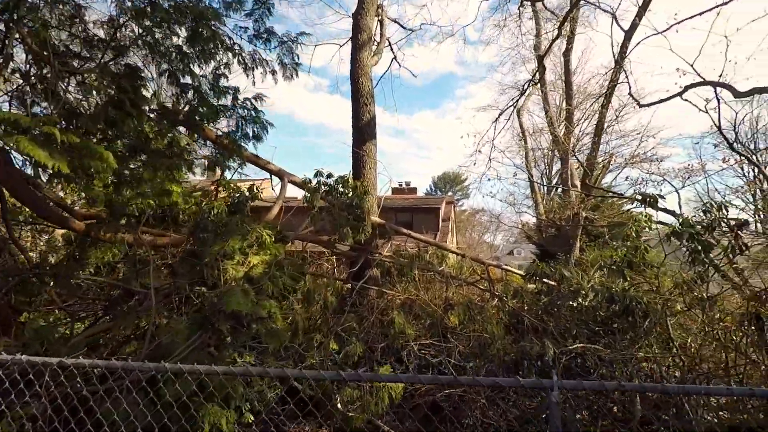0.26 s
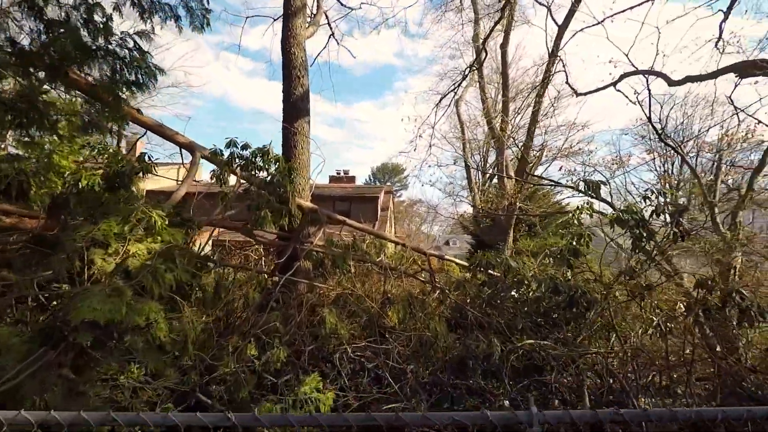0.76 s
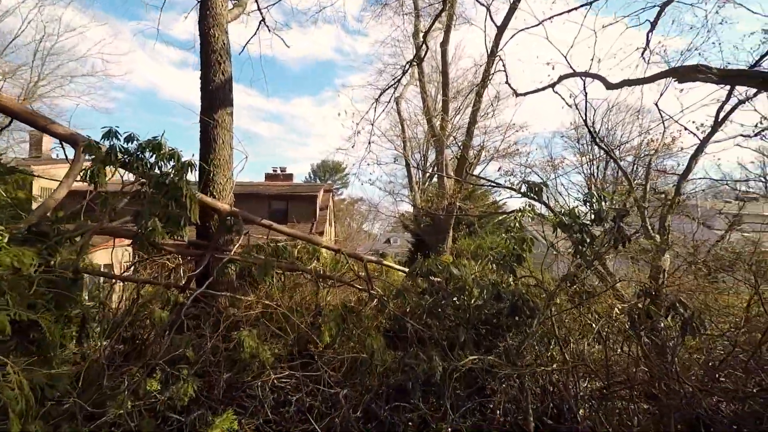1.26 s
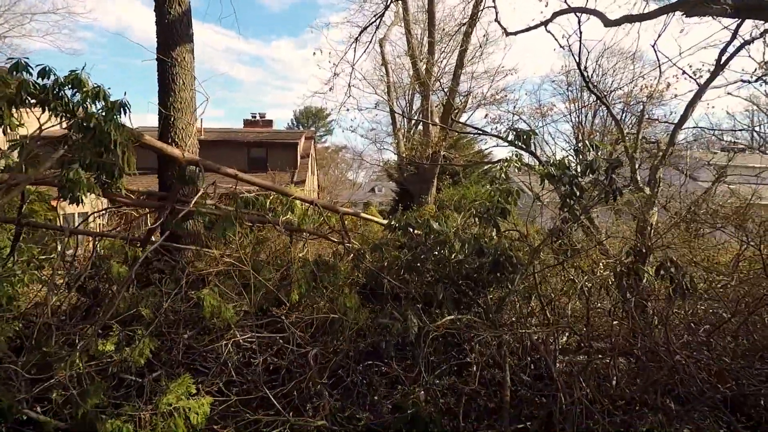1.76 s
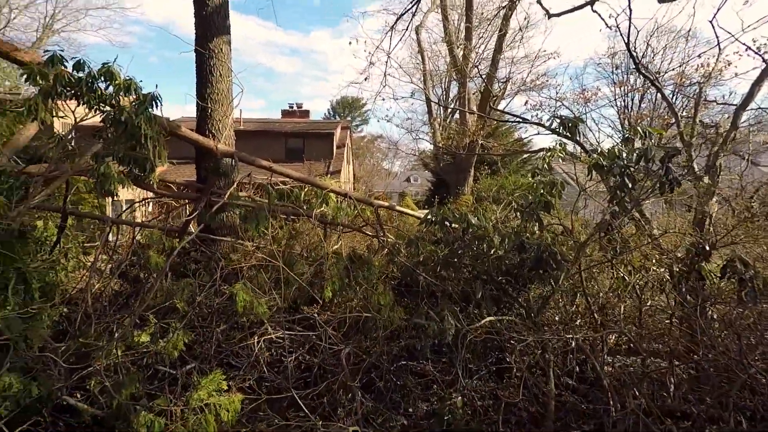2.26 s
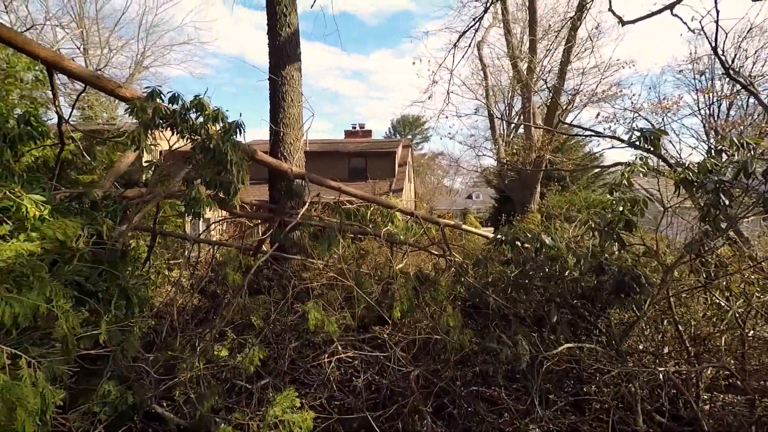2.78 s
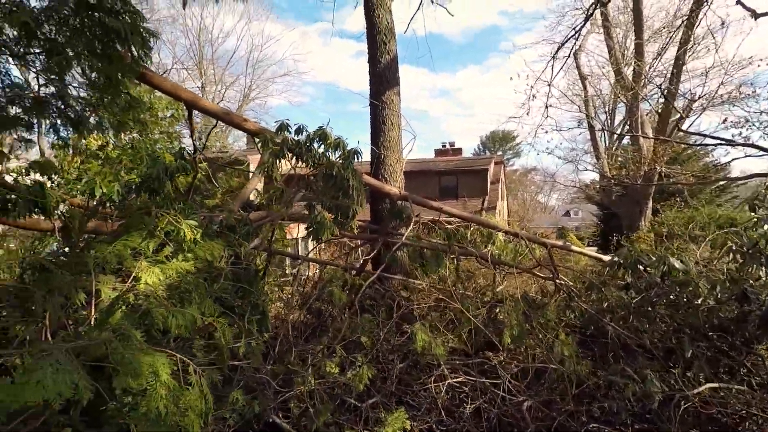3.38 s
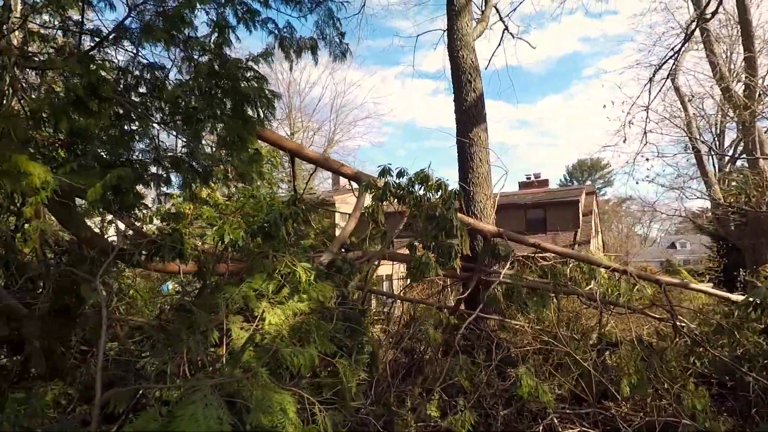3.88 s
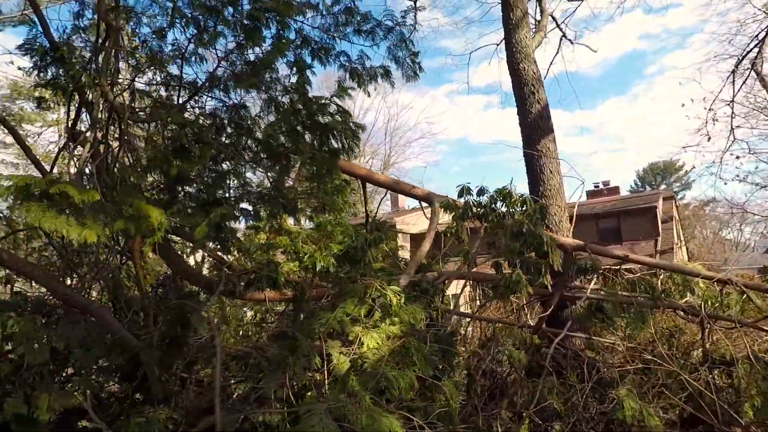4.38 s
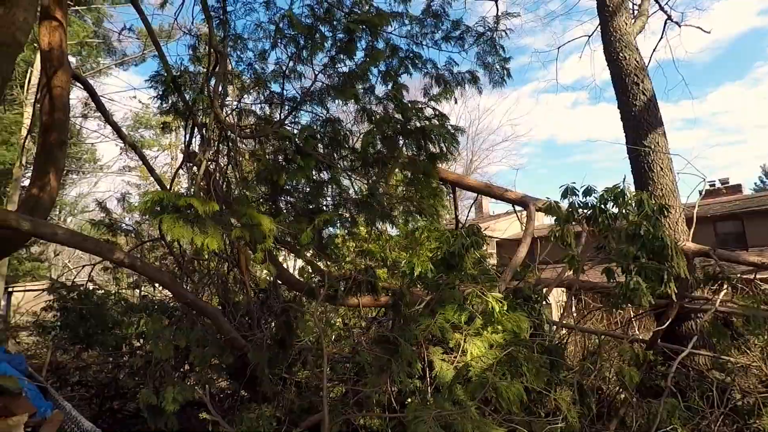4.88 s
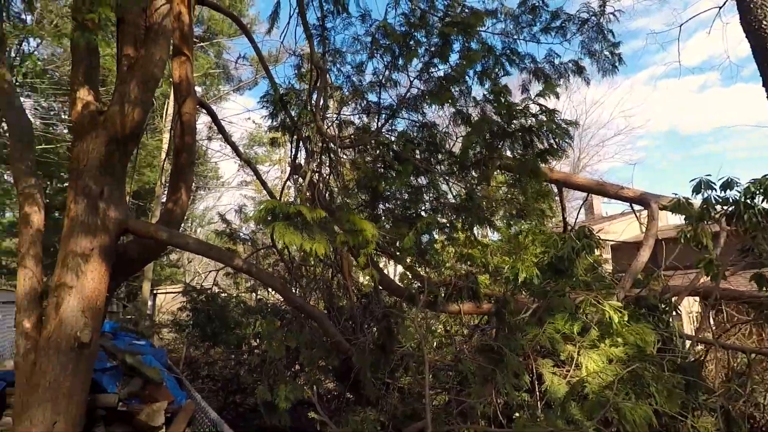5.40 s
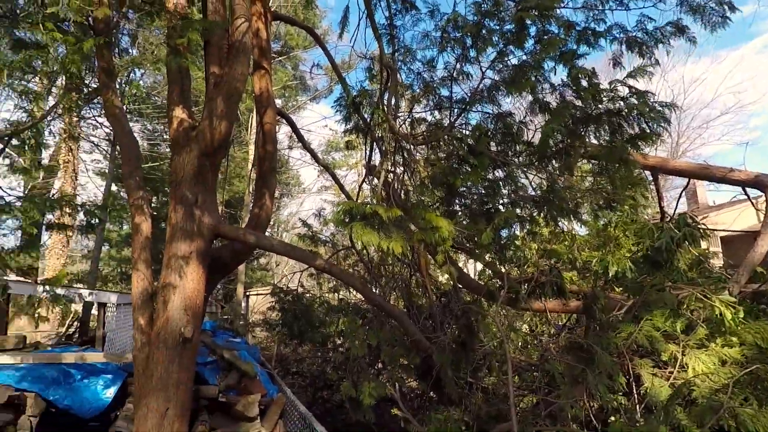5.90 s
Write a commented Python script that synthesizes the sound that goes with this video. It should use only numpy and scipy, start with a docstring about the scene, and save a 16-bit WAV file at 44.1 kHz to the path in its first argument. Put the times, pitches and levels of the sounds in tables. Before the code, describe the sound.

From 0 to 0.35 s, soft leaf rustle and a few knocks on the camera body, dull thuds with hollow plastic clacks, strongest near 0.25 s. At about 0.65 s dry twigs snap brightly amid leaf hiss and dull finger scrapes. A low wavering hum and wind rumble swell; at 1.2 s a heavy thud and clack land, and around 1.5 s a deep boom with more clacks, rustle and weak snaps. One last hard knock comes at 2.1 s, then the rumble fades by 3 s. Quiet open air remains, a soft broadband hush with faint thin tones and a tiny low tick ten times a second. A distant bird gives short hoarse, falling, echoing chirps near 0.9, 2.2, 3.2 to 3.5, 4.5, 5.3 and 6 s. Light leaf brushes and small twig ticks appear at 3.4, 4.9 and 5.6 to 5.9 s.

```python
"""A hand-held camera is jolted while its holder steps over twigs at a garden's edge, then stands still.
Its springy mount hums and booms, its case thuds and clacks, fingers scrape it: damped sines and coloured noise.
Dry twigs snap and leaves rustle, made from short noise bursts and clumped grains.
A small bird chirps far off as a gliding sine with echoes, in steady outdoor air made of noise and faint tones.
A soft pulse in the camera ticks about ten times a second."""
import sys
import numpy as np
from scipy import signal
from scipy.fft import rfft, irfft
from scipy.io import wavfile

SR = 44100
rng = np.random.default_rng(int(sys.argv[2]) if len(sys.argv) > 2 else 0)


def unload_audio(sound):
    """Save the sound as a 16-bit wav file, at the path given as the first command line argument."""
    columns = np.transpose(np.atleast_2d(sound))
    # keep every value between -1 and 1, then stretch to whole-number steps
    steps = np.round(np.clip(columns, -1, 1) * 32767)
    wavfile.write(sys.argv[1], SR, steps.astype(np.int16))


N = 270885
TIME = np.arange(N) / SR
HIT_TIME = TIME[:SR // 4]   # the time axis of one short sound, a quarter of a second

# In all functions t60 is the time to fade by 60 dB, and a positive pan_db leans left.


def from_db(db):
    """Turn decibels into gain."""
    return 10 ** (np.asarray(db) / 20)


def rms_one(x):
    """Scale a signal to unit power."""
    return x / np.sqrt(np.mean(x ** 2) + 1e-20)


def in_time(rows):
    """Join (t/s, value) rows by straight lines."""
    return np.interp(TIME, *np.transpose(rows))


def gain_at(points, size):
    """Gain of a (f/Hz, level/dB) colour on an FFT grid, falling 30 dB per octave beyond its ends."""
    hz, db = np.transpose(points)
    octave = np.log2(np.maximum(np.fft.rfftfreq(size, 1 / SR), 1))
    outside = np.abs(octave - np.clip(octave, np.log2(hz[0]), np.log2(hz[-1])))
    return from_db(np.interp(octave, np.log2(hz), db) - 30 * outside)


def noise(colour):
    """Coloured noise of unit power."""
    spectrum = rfft(rng.standard_normal(N))
    return rms_one(irfft(spectrum * gain_at(colour, N), N))


def drift(rate_hz):
    """Random wandering of unit power, mostly slower than rate_hz."""
    return noise([(1, 0), (rate_hz, 0)])


def ports(left, right, pan_db):
    """Two channels, leaning left by pan_db."""
    return np.array([left * from_db(pan_db / 2), right * from_db(-pan_db / 2)])


def add(out, s, sound):
    """Mix a sound in from time s on."""
    start = int(np.clip(round(s * SR), 0, N - 1))
    out[..., start:start + sound.shape[-1]] += sound[..., :N - start]


def swell(hz, rise_s, phase):
    """A damped resonance that takes rise_s to build up to an envelope of one."""
    age = HIT_TIME / rise_s
    envelope = (age * np.exp(1 - age)) ** 2
    return envelope * np.sin(2 * np.pi * hz * HIT_TIME + phase)


def mount(shake_db=-2.5, wind_db=-7, boom_db=-7, mount_hz=67, rise_s=0.0082, wander_hz=7, sway_db=3.5, pan_db=-1.5):
    """Uneven shaking keeps the springy mount humming, each jolt makes it boom, and wind rumbles along."""
    # sway of the camera, strongest while walking: t/s, relative level/dB
    shaking = [(0.0, -32.5), (0.55, -34.5), (1.1, -31), (1.35, -27), (1.7, -23.5), (1.93, -31),
               (2.45, -33.5), (2.93, -45.5), (3.0, -36.5), (3.28, -37.5), (3.35, -48.5), (4.25, -49),
               (4.75, -57.5), (5.55, -65), (6.14, -63)]
    # jolts that set the mount booming: t/s, relative level/dB
    jolts = [(0.639, -21.5), (1.017, -19), (1.211, -13.5), (1.402, -11), (1.496, -5.5), (1.601, -18),
             (1.971, -16.5), (2.091, -9), (2.575, -34), (2.681, -33.5)]
    # colour of the wind rumble on the ports: f/Hz, relative level/dB
    rumble_colour = [(20, -2), (35, 16), (50, 10.5), (80, -2), (105, 5), (140, -3.5), (200, -9), (300, -31),
                     (700, -37)]
    stir_db, stir_rise_s, stir_t60_s = -5, 0.0043, 0.46

    pitch = mount_hz + wander_hz * drift(18)
    sway = rms_one(from_db(sway_db * drift(22)))
    hum = np.sqrt(2) * sway * np.sin(2 * np.pi * np.cumsum(pitch) / SR)
    # each jolt also stirs up the shaking, which then dies away
    stir = (1 - np.exp(-TIME / stir_rise_s)) * from_db(stir_db - 60 * TIME / stir_t60_s)
    power = from_db(in_time(shaking)) ** 2
    for s, db in jolts:
        add(power, s, (from_db(db) * stir) ** 2)
    out = np.sqrt(power) * (from_db(shake_db) * hum + from_db(wind_db) * noise(rumble_colour))
    for s, db in jolts:
        add(out, s, from_db(db + boom_db) * swell(mount_hz, rise_s, 0))
    later = np.interp(TIME - .0007, TIME, out)   # the left port hears it 0.7 ms later
    return ports(later, out, pan_db)


def air(mid_db=-50, side_db=-44.5, drone_db=-50, whine_waver=0.93):
    """Far traffic and breeze as noise, a low drone in the case and faint wavering machine tones."""
    # colour of the air common to both ports: f/Hz, relative level/dB
    mid_colour = [(150, 1), (260, 2), (359, -0.5), (440, -1), (463, -0.5), (607, -4), (661, -4),
                  (810, -6.5), (1240, -8), (1300, -6.5), (2060, -12), (2990, -14.5), (3860, -18),
                  (9170, -18.5), (15000, -32)]
    # colour of the air opposed between the ports: f/Hz, relative level/dB
    side_colour = [(76, -38), (130, -4), (165, 9.5), (250, 1.5), (294, 1.5), (380, 1.5), (612, 1), (929, 1),
                   (2610, -15.5), (3000, -19), (3810, -23.5), (4740, -23.5), (6010, -18.5), (9690, -21.5),
                   (15000, -35)]
    # lean of the air to the left: f/Hz, left-right level/dB
    balance = [(60, -1.5), (110, 2.5), (200, -0.5), (380, 1), (700, 0.5), (1290, -0.5), (2380, 0),
               (4400, -0.5), (8120, -3), (15000, 0)]
    # colour of the low drone in the case: f/Hz, relative level/dB
    drone_colour = [(105, -66), (135, 3.5), (165, 0), (210, -8.5), (270, -10.5)]
    # distant machine tones, before their wavering: f/Hz, level/dB
    tones = [(1308, -67.5), (1631, -68)]

    mid = from_db(mid_db) * noise(mid_colour) + from_db(drone_db) * noise(drone_colour)
    for hz, db in tones:
        waver = 1 + whine_waver * drift(5.2)
        mid += from_db(db) * waver * np.sin(2 * np.pi * hz * TIME + drift(5.7))
    side = from_db(side_db) * noise(side_colour)
    lean_db = np.interp(np.fft.rfftfreq(N, 1 / SR), *np.transpose(balance))
    return irfft(ports(rfft(mid + side), rfft(mid - side), lean_db), N)


def brush(s, length):
    """A branch bends against the walker and slips off: an even, rounded swell and fade of height one."""
    along = (TIME - s) / length
    return np.exp(1 - np.sqrt(1 + (2 * along) ** 2))


def leaves(level_db=-4, crackle_db=-10, crackles_per_s=300, pan_db=-3):
    """Brushed leaves hiss in clumped grains, with tiny dry crackles among them."""
    # brushes against leaves and needles: t/s of the peak, length/s, relative level/dB
    brushes = [(0.001, 0.051, -46), (0.143, 0.1, -51), (0.665, 0.073, -42.5), (1.078, 0.24, -53.5),
               (1.51, 0.063, -47.5), (1.586, 0.036, -49.5), (3.422, 0.15, -52), (4.918, .055, -49.5),
               (5.565, 0.028, -52), (5.72, 0.034, -53), (5.786, 0.019, -62), (5.903, 0.087, -51)]
    # colour of the rustle: f/Hz, relative level/dB
    leaf_colour = [(1000, 8), (2800, 2), (5500, 1), (8500, -5.5), (12000, -12), (16000, -41)]

    hiss = rms_one(from_db(2 * drift(400) + 1.5 * drift(30)))
    born = (rng.random(N) < crackles_per_s / SR) * rng.uniform(0, 1, N)
    # each crackle fades over about a millisecond
    crackle = rms_one(signal.lfilter([1], [1, -np.exp(-1 / (.001 * SR))], born + 1e-18))
    grains = from_db(level_db) * hiss + from_db(crackle_db) * crackle
    contact = sum(from_db(db) * brush(s, length) for s, length, db in brushes)
    return contact * grains * ports(noise(leaf_colour), noise(leaf_colour), pan_db)


def pulse(level_db=-33.0, hz=165, rise_s=0.0049, spread_db=1.5, low_cut_hz=142, pan_db=-2.5):
    """A regular soft tick inside the camera: short low swells with their deepest part filtered off."""
    start_s, period_s = .0125, .10244
    out = np.zeros(N)
    for s in np.arange(start_s, N / SR, period_s):
        add(out, s, from_db(level_db + spread_db * rng.normal()) * swell(hz, rise_s, 0))
    high_pass = signal.butter(4, low_cut_hz, "high", fs=SR, output="sos")
    out = signal.sosfilt(high_pass, out + 1e-18)
    return ports(out, out, pan_db)


def fingers(pan_db=0):
    """Sliding skin rubs the case with an uneven, dull scrape."""
    # fingers sliding on the case: t/s of the middle, length/s, level/dB
    slides = [(0.155, 0.012, -42), (.553, .015, -47), (0.602, 0.021, -39), (0.668, 0.022, -32),
              (0.732, 0.026, -34), (0.78, 0.025, -40), (1.439, 0.017, -41), (1.498, 0.036, -35),
              (2.092, 0.017, -34.5)]
    # colour of the scrape: f/Hz, relative level/dB
    slide_colour = [(220, 17.5), (370, 12.5), (600, 0), (1000, -8), (1550, 6.5), (2150, -12), (3000, -16)]

    pressure = sum(from_db(db) * np.exp(-((TIME - s) / length) ** 2) for s, length, db in slides)
    slips = rms_one(from_db(3 * drift(200)))
    scrape = pressure * slips * noise(slide_colour)
    later = np.interp(TIME - .00025, TIME, scrape)   # the left port hears it 0.25 ms later
    return ports(later, scrape, pan_db)


def struck(modes, attack_s, pan_db):
    """One blow on a set of modes, each of slightly random strength; neighbours swing in opposite directions."""
    out = 0
    for k, (hz, db, t60, phase) in enumerate(modes):
        turn = 2 * np.pi * hz * HIT_TIME
        chance_db = 1.5 * rng.normal()
        fade = from_db(db + chance_db - 60 * HIT_TIME / t60)
        out = out + (-1) ** k * fade * ports(np.sin(turn + phase), np.sin(turn), pan_db)
    return out * (1 - np.exp(-HIT_TIME / attack_s))


def bursts(rows, colour, t60, tail_db, tail_t60, lag_s, apart):
    """A crack is a coloured noise burst that dies at once, then a weak tail; the right port hears it first."""
    out, size = np.zeros((2, N)), len(HIT_TIME)
    envelope = from_db(-60 * HIT_TIME / t60) + from_db(tail_db - 60 * HIT_TIME / tail_t60)
    envelope *= 1 - np.exp(-HIT_TIME / 0.000092)   # the break takes a moment
    # minimum phase: the colour makes nothing sound early
    cepstrum = irfft(np.log(gain_at(colour, 2 * size)))
    causal = np.exp(rfft(2 * cepstrum[:size] * (HIT_TIME > 0), 2 * size))
    for s, db, pan_db in rows:
        # one noise shared by both ports, plus a separate one for each
        grit = rng.standard_normal(size) + apart * rng.standard_normal((2, size))
        hit = irfft(rfft(grit * envelope, 2 * size) * causal)[:, :size]
        left, right = hit / np.std(hit[:, :SR // 200], axis=1, keepdims=True)   # level of the first 5 ms
        left = np.interp(HIT_TIME - lag_s, HIT_TIME, left, left=0)
        add(out, s, from_db(db) * ports(left, right, pan_db))
    return out


def clacks(clack_db=-8.0, focus_db=20, crack_db=1):
    """Hard contacts ring the hollow case, the shell modes nearest their own pitch, and a thin crack on top."""
    # hard contacts: t/s, relative shell level/dB, shell pitch f/Hz, hollow level/dB, relative crack level/dB
    contacts = [(0.1457, -30, 1610, -44.5, -49), (0.2441, -19.5, 1390, -27.5, -46),
                (0.2502, -11.5, 1520, -33, -42.5), (0.3185, -34, 1590, -34.5, -69),
                (0.3239, -29.5, 1420, -42, -69), (0.7819, -27, 1490, -51, -56),
                (1.2029, -24, 2100, -36.5, -44), (1.2154, -10, 1960, -22.5, -34.5),
                (1.2535, -21.5, 1500, -37.5, -41), (1.493, -13, 1770, -35, -36),
                (1.5122, -15, 1900, -26.5, -40), (2.0935, -11, 2050, -35, -37.5)]
    # modes of the stiff plastic shell: f/Hz, relative level/dB, t60/s, phase between the two ports/rad
    shell_modes = [(1120, 2, 0.014, 1.5), (1205, 3, 0.031, 2.54), (1396, 2, 0.035, 1.44),
                   (1600, 4.5, 0.019, 1.8), (1960, -0.5, 0.019, 1.6), (2210, -3.5, 0.03, 1.7),
                   (2480, -15, 0.012, 1.6)]
    # hollow modes of the case: f/Hz, relative level/dB, t60/s, phase between the two ports/rad
    case_modes = [(282.3, -7.5, 0.29, 0.63), (359, 8, 0.074, 1.64), (511, 3, 0.076, 1.58),
                  (642, 6, 0.052, 2.82), (793, 9.5, 0.041, 2.9)]
    # colour of the thin crack: f/Hz, relative level/dB
    crack_colour = [(900, 19), (2000, 2.5), (3000, 3), (4200, -2.5), (5600, 0), (7500, -16), (14000, -34)]

    out = np.zeros((2, N))
    for s, peak, pitch, hollow, _ in contacts:
        # a mode weakens by focus_db per octave away from the pitch
        shell = [(hz, db - focus_db * abs(np.log2(hz / pitch)), t60, phase)
                 for hz, db, t60, phase in shell_modes]
        add(out, s, from_db(peak + clack_db) * struck(shell, attack_s=0.00056, pan_db=1.0))
        add(out, s, from_db(hollow) * struck(case_modes, attack_s=0.0017, pan_db=4))
    cracks = [(s, crack + crack_db, -1) for s, _, _, _, crack in contacts]
    return out + bursts(cracks, crack_colour, t60=0.03, tail_db=-16, tail_t60=0.033, lag_s=0.000296, apart=0.88)


def thuds(level_db=-0.5, ring_db=-17, ring_hz=186, ring_t60=0.422, port_phase=-0.55, pan_db=-3):
    """Soft blows give a few low cycles and leave the case ringing faintly; the ports move slightly out of step."""
    # dull blows on the case: t/s, relative level/dB, pitch f/Hz
    blows = [(0.151, -19.5, 174), (0.248, -9, 197), (0.317, -13, 184), (0.544, -23, 185), (0.658, -13, 170),
             (0.711, -24, 178), (0.734, -21, 139), (0.76, -23.5, 180), (0.91, -25, 194),
             (1.212, -4.5, 153.7), (1.439, -19, 180), (1.488, -8.5, 145), (1.504, -14, 191),
             (1.86, -24.5, 117), (2.094, -18.5, 140), (3.281, -29, 183)]

    out = np.zeros((2, N))
    ring = from_db(ring_db - 60 * HIT_TIME / ring_t60) * np.sin(2 * np.pi * ring_hz * HIT_TIME)
    for s, db, hz in blows:
        left, right = swell(hz, 1 / hz, port_phase), swell(hz, 1 / hz, 0)   # each builds up over one cycle
        add(out, s, from_db(db + level_db) * ports(left + ring, right + ring, pan_db))
    return out


def twigs(level_db=-3):
    """Dry wood breaks with a bright crack that scatters among the bushes."""
    # twigs breaking: t/s, relative level/dB, left-right level/dB
    snaps = [(0.634, -20, -2.5), (0.64, -29, -14), (0.6715, -21, -3.5), (0.6795, -41, 5), (1.455, -34, -5),
             (1.488, -42, -11), (1.5103, -38, -4), (4.8994, -41, -7.5), (5.561, -55, -1.0),
             (5.8353, -45.5, -1)]
    # colour of a snap: f/Hz, relative level/dB
    snap_colour = [(600, -18), (1400, -2.5), (2400, -9.5), (3100, 3), (4300, -18), (5400, 9), (6500, -5.5),
                   (7700, -1), (10000, -7), (13000, -18), (16000, -17)]

    cracks = bursts(snaps, snap_colour, t60=0.012, tail_db=-20.5, tail_t60=0.091, lag_s=0.000245, apart=0.6)
    return from_db(level_db) * cracks


def whistle(hz, hoarseness):
    """A sine whose pitch flutters at random; more flutter sounds hoarser."""
    flutter = drift(300)
    return np.sin(2 * np.pi * np.cumsum(hz * (1 + hoarseness * flutter)) / SR)


def bird(direct_db=-5.5, echo_db=-2, echo_t60=0.36, pan_db=-3):
    """A whistle rises hoarsely and slurs down more clearly, smeared by echoes from the trees."""
    # chirps: t/s where the slur starts, relative level/dB, pitch f/Hz there, slur length/s,
    # depth of the glide [times slur_octaves], upstroke against the slur level/dB
    chirps = [(0.909, -43, 3770, 0.075, 0.51, -18), (2.205, -38.5, 3600, 0.072, 1.23, -9),
              (3.221, -38.5, 3400, 0.08, 0.9, -6.5), (3.381, -43.5, 3225, 0.023, 0.4, -7),
              (3.485, -47.5, 3253, .13, 1, -11), (4.458, -43, 3520, 0.09, 1.3, -5),
              (5.312, -44.5, 3310, 0.1, .5, -11), (5.955, -41, 3440, 0.07, 1.13, -8)]
    # upstroke: length as a share of the slur's, pitch ratios at its start and end
    upstroke_share, upstroke_from, upstroke_to = .5, 1.06, 1.24
    # slur: attack, then fall of pitch and of level over its length
    slur_attack_s, slur_octaves, slur_fade_db = 0.0048, .48, 17.5

    up_hz, up_gain, down_hz, down_gain = np.zeros((4, N))
    for s, db, hz, length, glide, upstroke_db in chirps:
        up_length = upstroke_share * length
        along = np.linspace(0, 1, int(up_length * SR))
        start = s - up_length
        add(up_hz, start, hz * (upstroke_from + (upstroke_to - upstroke_from) * along))
        add(up_gain, start, from_db(db + upstroke_db) * 2 * np.sqrt(along * (1 - along)))
        along = np.linspace(0, 1, int(length * SR))
        attack = 1 - np.exp(-along * length / slur_attack_s)
        add(down_hz, s, hz * 2 ** (-slur_octaves * glide * along))
        add(down_gain, s, from_db(db - slur_fade_db * along) * attack)
    song = up_gain * whistle(up_hz, .08) + down_gain * whistle(down_hz, .035)
    near, far = from_db(-60 * HIT_TIME / 0.05), from_db(-60 * HIT_TIME / echo_t60)
    trees = rng.standard_normal((2, len(HIT_TIME))) * (near + far)
    trees /= np.linalg.norm(trees, axis=1, keepdims=True)
    echoes = signal.fftconvolve(song[None], trees)[:, :N]
    left, right = from_db(direct_db) * song + from_db(echo_db) * echoes
    return ports(left, right, pan_db)


def gain_control(x, threshold_db=-15, share=0.2, attack_s=0.058, release_db_per_s=7):
    """Peaks above the threshold turn the gain down a little, and it creeps back."""
    peak_db = 20 * np.log10(np.abs(x).max(axis=0) + 1e-9)
    cut_db = share * np.maximum(peak_db - threshold_db, 0)
    # hold the deepest cut, letting go at a steady rate
    held_db = np.maximum.accumulate(cut_db + release_db_per_s * TIME) - release_db_per_s * TIME
    keep = np.exp(-1 / (attack_s * SR))
    return x * from_db(-signal.lfilter([1 - keep], [1, -keep], held_db))


def scene():
    """Everything that reaches the two microphone ports."""
    camera = mount() + pulse() + fingers() + clacks() + thuds()
    return camera + air() + leaves() + twigs() + bird()


def record(dry, cutoff_hz=15300):
    """The gain ducks after knocks, peaks are softly rounded off, and the top is cut steeply."""
    rounded = 1.1 * np.tanh(gain_control(dry) / 1.1)
    low_pass = signal.ellip(10, .1, 80, cutoff_hz, fs=SR, output="sos")
    return signal.sosfilt(low_pass, rounded)


dry = scene()
out = record(dry)
unload_audio(out)
```